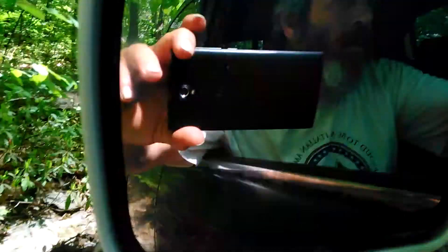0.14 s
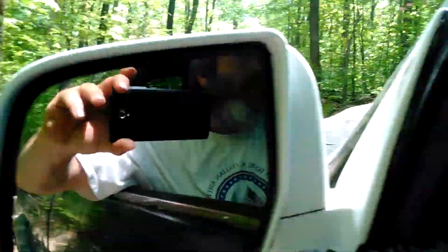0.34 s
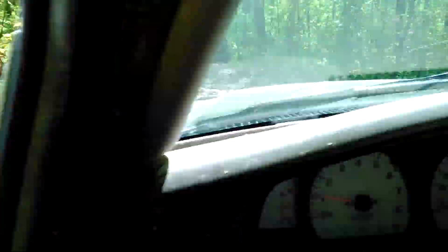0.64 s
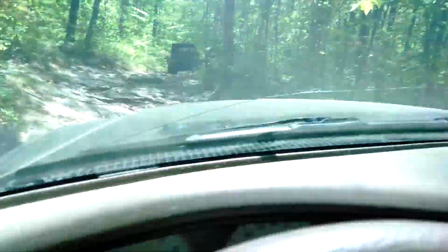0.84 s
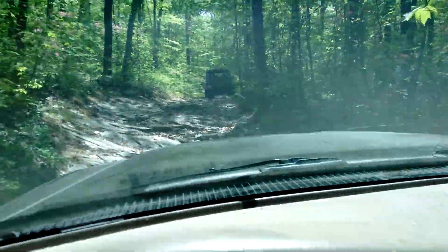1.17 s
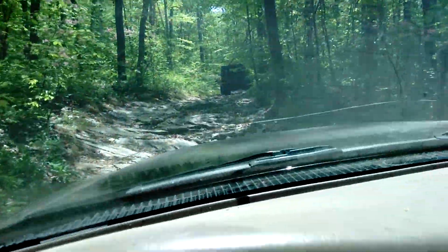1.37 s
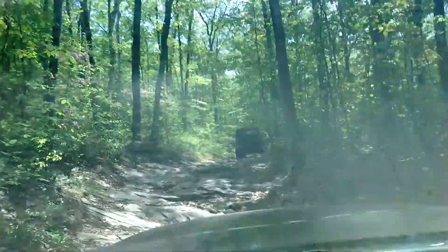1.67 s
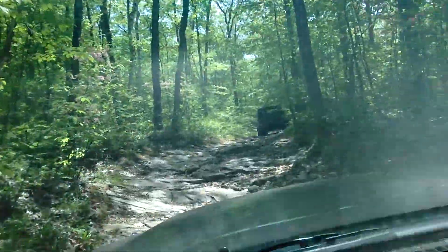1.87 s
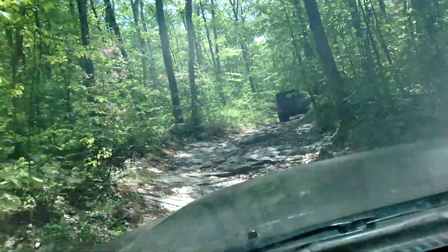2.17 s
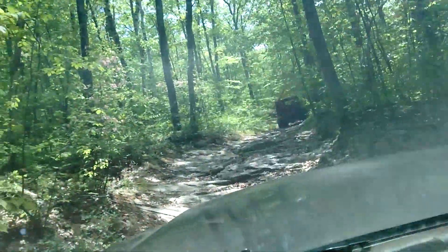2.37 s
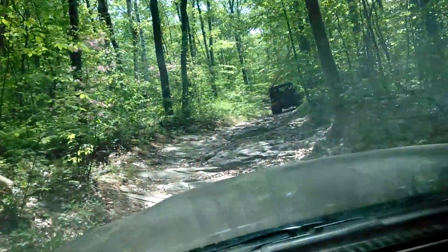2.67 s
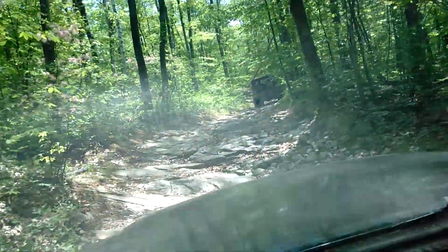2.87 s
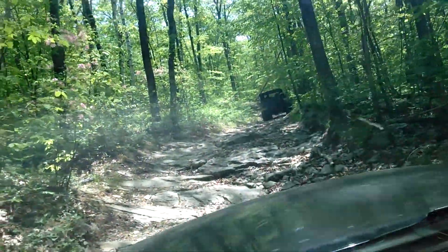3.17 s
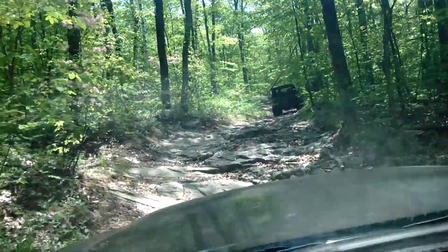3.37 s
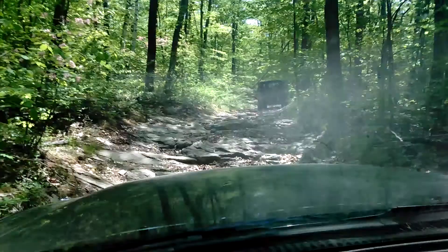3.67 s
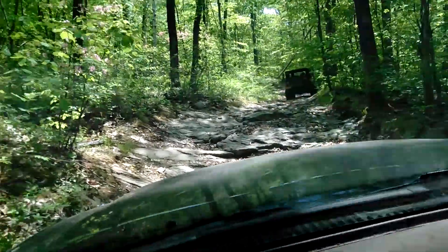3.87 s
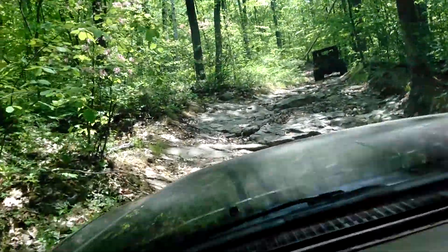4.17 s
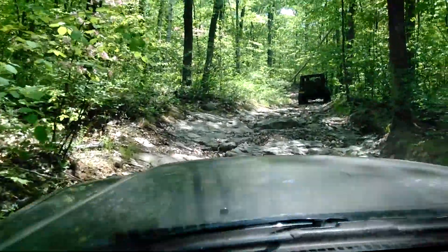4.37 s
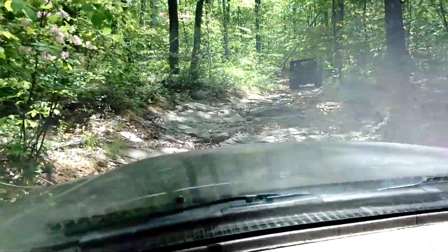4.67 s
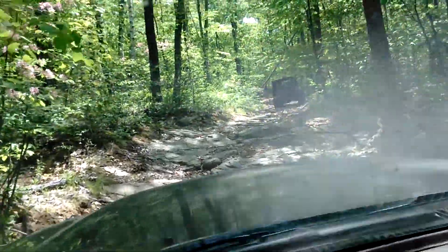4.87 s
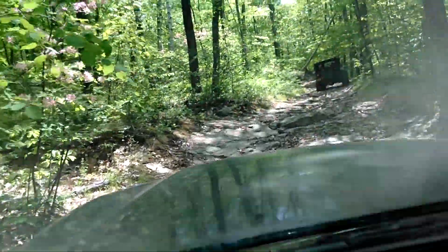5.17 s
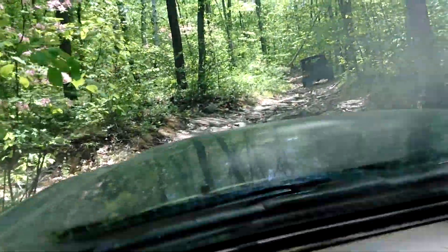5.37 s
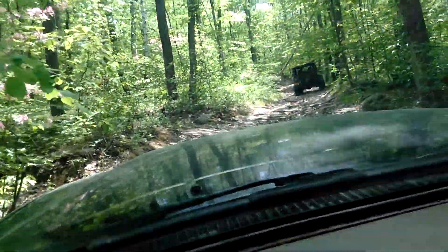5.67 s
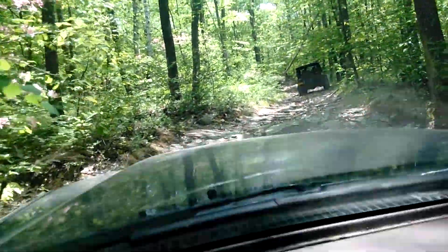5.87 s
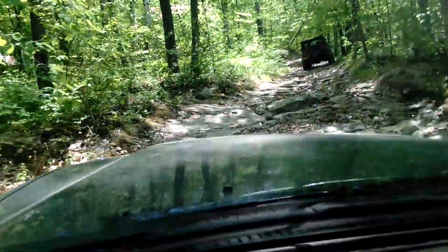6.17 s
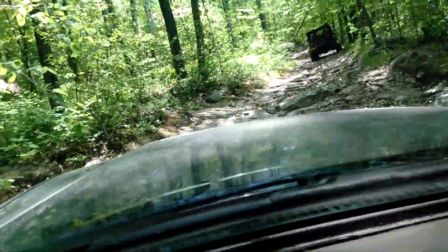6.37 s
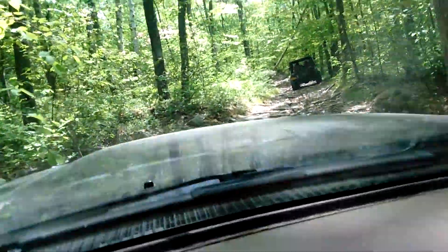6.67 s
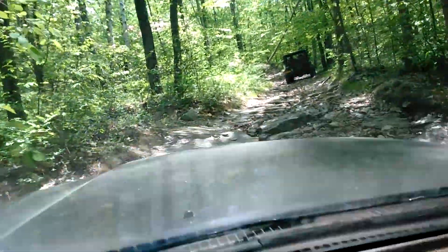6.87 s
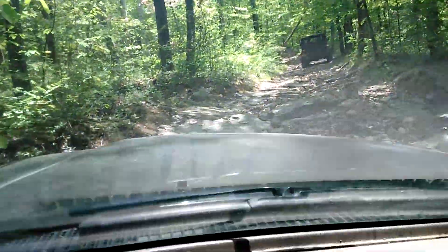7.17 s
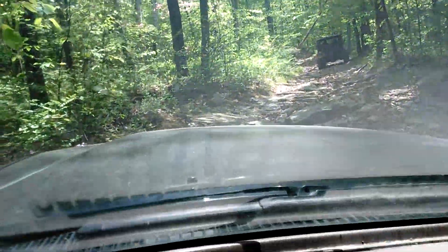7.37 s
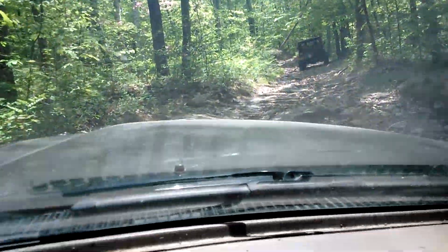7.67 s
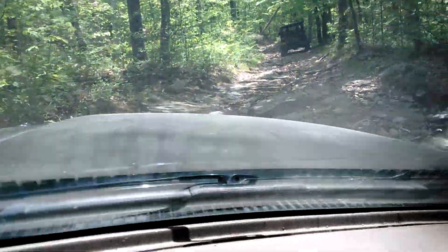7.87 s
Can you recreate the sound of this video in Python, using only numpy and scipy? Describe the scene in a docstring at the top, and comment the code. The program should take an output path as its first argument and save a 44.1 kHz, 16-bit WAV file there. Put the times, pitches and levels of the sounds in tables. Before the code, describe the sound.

A truck engine booms and roars in bursts of throttle, heard from the cab, with trim knocking and metal clinking over rocks.

```python
"""Off-road truck on a rocky climb

From the driver's seat, a truck climbs a forest trail in bursts of throttle. Exhaust pulses boom in the
cabin over the roar of engine and tyres, and a thin hiss comes and goes. At first the microphone is
outside the window, buffeted by wind as it is drawn in. Hand and trim scrape, two bright rustles pass
on the left, and at each rock the trim knocks into the panels and loose metal clinks."""
import sys
import numpy as np
from scipy import signal
from scipy.fft import rfft, irfft
from scipy.io import wavfile

SR = 44100
rng = np.random.default_rng(int(sys.argv[2]) if len(sys.argv) > 2 else 0)


def wrap_up_sound(samples):
    """Save the sound to the file named by the first command line argument, as 16-bit audio."""
    columns = np.atleast_2d(samples).T
    # keep every value between -1 and 1, then stretch to whole-number steps
    tamed = np.clip(columns, -1, 1)
    steps = np.round(tamed * 32767).astype(np.int16)
    wavfile.write(sys.argv[1], SR, steps)


N = 354123
TIME = np.arange(N) / SR
EQ_HZ = np.linspace(0, SR / 2, 2 ** 10 + 1)
INSIDE_S = .75  # the microphone is in the cab from here on
UPPER_FLUTTER = .33  # depth of the waver on the exhaust's upper partials

# Table levels are relative: each layer adds its own gain.
# pushes of the throttle (press [s], climb [s], hold [s], one bank's pulse rate at the press [Hz],
# at the top [Hz], load [dB], extra fade after the lift [dB/s])
THROTTLE_PUSHES = [(-0.31, 0.18, 0.16, 35, 37.33, -22, 45), (0.618, 0.4, 0.21, 35.56, 47.7, -19, 27),
                   (1.92, 0.25, 0.031, 24.02, 33.13, -18, -17), (2.204, 0.21, 0.046, 30.15, 36.6, -16.5, 1),
                   (3.033, 0.69, 0.48, 20.81, 47.31, -21, 16),
                   (4.191, 0.43, 0.024, 36.86, 51.25, -18.5, 46),
                   (5.111, 0.16, 0.012, 34.76, 35.1, -14.5, -2),
                   (5.274, .32, 0.13, 35.24, 47.4, -16.5, 109), (6.166, 0.43, 0.22, 27.53, 49.01, -17, 25),
                   (6.779, 0.082, 0.26, 45.64, 46.46, -18.5, 74),
                   (7.281, 0.31, 0.019, 24.47, 41.31, -17, 36)]
# the cabin's response to the exhaust (frequency [Hz], gain [dB])
CABIN_EQ = [(24, -38), (32, -21), (37, -9), (42, -2.5), (49, 5), (62, 9.5), (75, 5), (97, 1), (130, -6),
            (195, -18.5), (248, -9), (300, -13), (420, -27)]
# cylinder growl as the cabin passes it (frequency [Hz], level [dB])
GROWL_EQ = [(45, -35), (62, -28), (92, -25), (120, -27), (165, -26), (200, -32), (245, -26), (295, -26),
            (335, -31), (390, -35), (560, -44)]
# roar of engine and tyres (frequency [Hz], level [dB])
ROAR_EQ = [(30, -21), (50, 0), (95, 4.5), (135, -9.5), (166, 2.5), (215, -7), (290, -15), (400, -12),
           (600, -17.5), (1000, -23), (1300, -40.5), (6000, -49)]
# stereo width of the noise beds (frequency [Hz], left-right likeness [ratio, capped at 1])
STEREO_LIKENESS = [(110, 4.5), (140, 0.83), (300, 1), (600, .5), (1500, -0.22), (10000, 0.09)]
# stereo lean of the noise beds (frequency [Hz], left minus right [dB])
STEREO_LEAN = [(100, -1.5), (1400, 1), (2200, 2), (4400, 8.5), (6300, 0.5), (8200, -5.5), (10200, -11),
               (12000, 3.5), (14000, 5)]
# cabin air (frequency [Hz], level [dB])
AIR_EQ = [(500, 9.5), (1200, -2.5), (2100, 6), (3200, 2.5), (4400, -0.5), (6000, -8), (9000, 0.5),
          (12000, 5.5), (14500, -11.5)]
# thin top end of the hiss, snaps and cracks (frequency [Hz], level [dB])
HISS_EQ = [(2500, -11), (6000, -13.5), (8000, -10), (9300, -6.5), (10500, 0.5), (12000, -1.5),
           (13200, -6.5), (14500, -12.5)]
# swishes of hiss (start [s], length [s], level [dB])
HISS_SWISHES = [(-0.04, 0.25, -49.5), (0.664, 0.045, -46), (1.532, 0.098, -48.5), (2.083, 0.42, -50.5),
                (2.82, 0.73, -50), (4.442, 0.05, -48.5), (4.688, 0.31, -53), (5.376, 0.17, -46),
                (5.797, 0.52, -52.5), (6.548, 1, -54), (7.858, 0.1, -43.5)]
# tone of the open air (frequency [Hz], level [dB])
OPEN_AIR_EQ = [(200, -25), (450, 2), (900, -0.5), (1400, 1), (2300, -7.5), (3600, -23.5), (7000, -30)]
# swell and fade of the open air (time [s], level [dB])
OPEN_AIR_FADE = [(0, -50.5), (.08, -37), (.18, -40.5), (.3, -46.5), (.5, -48), (.72, -49), (.85, -57)]
# wind thumping the microphone (frequency [Hz], level [dB])
BUFFET_EQ = [(30, -19), (70, 11), (150, -0.5), (300, -7), (600, -9.5), (1200, -22.5), (2200, -47),
             (4500, -87)]
# eddies striking the microphone (time [s], level [dB], length [s], tilt [dB/octave])
EDDY_HITS = [(0.43, -30.5, 0.025, -1.5), (0.476, -23.5, 0.011, -0.5), (0.492, -24, 0.053, -3.5),
             (0.542, -23.5, 0.024, 1), (0.569, -14.5, 0.013, -2), (0.584, -18, 0.029, -4.5),
             (0.626, -17.5, 0.0068, 2.5), (0.633, -19.5, 0.019, -5), (0.681, -18, 0.012, 1),
             (0.696, -18, 0.0098, 5.5), (0.709, -22, 0.0086, 5)]
# dry scrapes and creaks of hand and trim (start [s], length [s], level [dB], centre [Hz])
SCRAPE_CUES = [(0.052, 0.039, -52, 3900), (0.146, 0.043, -51, 4370), (1.119, 0.024, -47.5, 1120),
               (2.027, 0.095, -56, 4460), (2.2, 0.1, -35, 538), (2.316, .025, -49.5, 1680),
               (2.888, .13, -58.5, 4450), (6.258, 0.024, -46, 2040)]
# knocks of trim, chassis and handling (time [s], body [dB], centre [Hz], spread [octaves], snap [dB])
KNOCK_HITS = [(0.109, -26.5, 605, 0.64, -64), (0.519, -43, 1830, 0.1, -51), (0.634, -42, 1980, 0.39, -70),
              (2.662, -46.5, 1640, 0.19, -46.5), (3.746, -42.5, 1505, 0.55, -40.5),
              (3.818, -51, 1810, 0.47, -53), (4.022, -39, 2350, 0.64, -35), (4.739, -35, 1134, 0.84, -31.5),
              (4.767, -40, 1850, 1.3, -37), (4.926, -41.5, 2400, 1.8, -49), (5.493, -35, 800, 0.54, -28.5),
              (5.517, -49, 840, 0.88, -38), (5.808, -36, 520, 0.36, -62), (5.877, -36.5, 990, 0.74, -34),
              (6.012, -44, 1550, 0.79, -35), (6.033, -33, 1250, 0.89, -29), (6.079, -49.5, 3600, 0.52, -44),
              (6.642, -44.5, 908, 0.82, -38), (6.811, -34.5, 1290, 0.84, -33),
              (6.861, -32, 1457, 0.78, -34.5), (7.014, -37.5, 1113, 0.61, -42),
              (7.074, -43, 1790, 1.2, -54), (7.856, -39.5, 1298, 0.58, -36),
              (7.898, -34.5, 1868, 0.46, -56)]
# panel resonances (frequency [Hz], width [Hz], boost [dB])
PANEL_PEAKS = [(727, 70, 9), (1160, 70, 6), (1670, 90, 4), (4125, 130, 9)]
# clinks of loose metal, and two short bright rustles on the left at 1.355 and 1.503 s (time [s],
# level [dB], ring pitch [Hz], left minus right [dB], ring over crack [dB], chatter t60 [s])
CLINK_AND_RUSTLE_CUES = [(0.75, -19.5, 9400, -4, -8, 0.027), (1.355, -31, 11750, 12, -8, 0.18),
                         (1.503, -29, 12600, 16, 3, 0.18), (1.5995, -11, 10520, 2.5, -9, 0.007),
                         (1.9056, -24.5, 11100, 14.5, -15, 0.0053), (2.164, -25, 10580, 4, -9, 0.013),
                         (4.0184, -11.5, 10940, -3, -3, 0.037), (4.028, -10.5, 11900, 1, 5, 0.029),
                         (4.78, -10, 11900, 1, 9, .04), (4.9245, -6.5, 10400, -2, -21, 0.024),
                         (5.8778, -15, 11900, -3, 3, 0.017), (6.0083, -17, 9860, 3.5, -6, 0.023),
                         (6.073, -23, 12900, 4, 1, 0.11), (6.159, -1.5, 11710, 5.5, 13, 0.04),
                         (6.18, -16, 12300, 6, -8, .04), (6.234, -17, 11360, 1, -2, 0.061),
                         (7.0151, -2.5, 12430, -7, -20, 0.0064), (7.022, -9, 10800, 2, -9, 0.04),
                         (7.074, -13, 11500, -5, -9, 0.014), (7.279, -17, 11900, -3, -27, 0.11),
                         (7.5705, -18, 10570, -7, -4, 0.029)]
# modes of the bright ring (multiple of ring pitch [ratio], level [dB], t60 [s])
RING_MODES = [(.53, -16, .04), (.82, -6, .045), (.917, -6, .035), (1, 0, .036), (1.035, -2, .036),
              (1.13, -2, .025)]


def amp(db):
    """Decibels to gain."""
    return 10 ** (np.asarray(db) / 20)


def unit_rms(x):
    """Scales to an rms of one."""
    return x / np.sqrt(np.mean(x ** 2) + 1e-20)


def curve_at(points, hz):
    """Reads a curve on a log-frequency axis."""
    f, value = np.transpose(points)
    return np.interp(np.log(hz + 1), np.log(f), value)


def since(s):
    """Seconds since a cue; zero before it."""
    return np.maximum(TIME - s, 0)


def glide(s, length, skew):
    """An S-curve from zero to one; a skew under one makes it move early."""
    return np.sin(np.pi / 2 * np.minimum(since(s) / max(length, 1 / SR), 1) ** skew) ** 2


def place(mix, s, sound, pan_db=0):
    """Drops a stereo sound into the mix; positive pan is left."""
    part = mix[:, max(round(s * SR), 0):][:, :sound.shape[1]]
    part += (sound * amp([[pan_db / 2], [-pan_db / 2]]))[:, :part.shape[1]]


def wander(rate_hz, size=4096):
    """Smooth random drift of unit size, no faster than the given rate."""
    hz = np.fft.rfftfreq(size, N / SR / size)
    slow = unit_rms(irfft(rfft(rng.standard_normal(size)) * (hz < rate_hz) * (hz > 0), size))
    return np.interp(TIME, np.linspace(0, N / SR, size), slow)


def noise_bed(spectrum):
    """Coloured stereo noise, narrow in the bass and wide in the treble."""
    hz = np.fft.rfftfreq(N, 1 / SR)
    common, separate = rfft(rng.standard_normal((2, N)))
    likeness = np.clip(curve_at(STEREO_LIKENESS, hz), -1, 1)
    lean = amp(curve_at(STEREO_LEAN, hz) / 2)
    right = likeness * common + np.sqrt(1 - likeness ** 2) * separate
    stereo = np.array([common * lean, right / lean])
    return unit_rms(irfft(stereo * amp(curve_at(spectrum, hz)), N))


def equalise(x, gain_db):
    """Causal filter with a gain for each frequency in EQ_HZ."""
    log_gain = np.log(amp(np.r_[gain_db, gain_db[-2:0:-1]]))
    taps = np.fft.ifft(np.exp(np.conj(signal.hilbert(log_gain)))).real
    return signal.fftconvolve(x, taps[None], axes=1)[:, :x.shape[1]]


def throttle(sag_hz_per_s=10.4, attack_s=.19, ease_db_per_s=32, coast_db=-45.5):
    """Pulse rate and load: revs climb on the press, sag against the slope, run down after the lift."""
    pulse_hz, load = np.zeros(N), np.full(N, amp(coast_db))
    troughs = [(row[0], row[3]) for row in THROTTLE_PUSHES[1:]] + [(8.15, 25)]  # ends at idle
    for row, (next_s, next_hz) in zip(THROTTLE_PUSHES, troughs):
        press, climb, hold, low_hz, top_hz, db, drop = row
        crest, lift = press + climb, press + climb + hold
        sag_hz = sag_hz_per_s * (since(crest) - since(lift))
        driven = low_hz + (top_hz - low_hz) * glide(press, climb, skew=1.06) - sag_hz
        revs = driven + (next_hz - driven) * glide(lift, next_s - lift, skew=.78)
        pulse_hz = np.where(TIME >= press, revs, pulse_hz)
        attack = np.minimum(since(press) / attack_s, 1)
        load = np.maximum(load, attack * amp(db - ease_db_per_s * since(crest) - drop * since(lift)))
    return pulse_hz, load


def boom(angle, pulse_hz, fall_db=6.5, bite_db=2):
    """Exhaust harmonics sweep through the cabin's resonance, biting harder as the revs climb."""
    out = np.zeros(N)
    pulling = np.tanh(np.gradient(pulse_hz) * SR / 20)
    for k in range(1, 10):
        gain = amp(curve_at(CABIN_EQ, k * pulse_hz) - (fall_db - bite_db * pulling) * np.log2(k))
        flutter = 1 + UPPER_FLUTTER * wander(13) if k > 2 else amp(1.3 * wander(28))
        out += gain * flutter * np.cos(k * angle + 2 * np.pi * rng.random())
    return out


def growl(angle, pulse_hz, revs_db_per_octave=3, width_radians_per_hz=.0037):
    """A bank's three cylinders fire unequally: partials at thirds of the pulse rate ride the revs."""
    out = np.zeros((2, N))
    for k in range(4, 39):
        hz = k * pulse_hz / 3
        phase = k * angle / 3 + 2 * np.pi * rng.random()
        apart = width_radians_per_hz * hz * rng.standard_normal() / 2
        flutter = 1 + UPPER_FLUTTER * wander(8)
        out += amp(curve_at(GROWL_EQ, hz)) * flutter * np.cos([phase + apart, phase - apart])
    return out * amp(revs_db_per_octave * np.log2(pulse_hz / pulse_hz.mean()))


def roar(load, lumps_db=2.5, dull_hz=300, coast_db=-33.5, load_db=-30.5):
    """Engine and tyres roar louder and brighter under load; muffled until the microphone settles."""
    full = noise_bed(ROAR_EQ)
    dull = signal.sosfilt(signal.butter(1, dull_hz, fs=SR, output="sos"), full)
    muffle_db = np.interp(TIME, [2.04, 2.05], [-7, 0])
    brightness = (.66 + 1.715 * load) * amp(muffle_db)
    level = amp(coast_db) + amp(load_db) * load
    return (dull + brightness * (full - dull)) * level * amp(lumps_db * wander(25))


def engine(wobble=.004, throb=.04, boom_db=3):
    """The exhaust booms and growls with the load; the roar throbs with the firings."""
    pulse_hz, load = throttle()
    angle = 2 * np.pi * np.cumsum(pulse_hz * (1 + wobble * wander(12))) / SR
    exhaust = load * (amp(boom_db) * boom(angle, pulse_hz) + growl(angle, pulse_hz))
    firings = 1 + throb * np.cos(2 * angle)  # two banks: two firings per turn of the angle
    return exhaust * amp([[.6], [-.6]]) + roar(load) * firings


def hiss(floor_db=-61, attack_s=.03, fade_db_per_s=75, flicker_db=2, gain_db=2):
    """Cabin air, and a thin hiss that comes in swishes: a quick rise, a hold and a fade."""
    power = amp(floor_db) ** 2
    for s, length, db in HISS_SWISHES:
        swish = np.minimum(since(s) / attack_s, 1) * amp(db - fade_db_per_s * since(s + length))
        power = power + swish ** 2
    air_db = np.interp(TIME, [1.3, 2.0], [-58, -55])  # swells as the microphone settles inside
    air = noise_bed(AIR_EQ) * amp(air_db + wander(7.4))
    return air + noise_bed(HISS_EQ) * np.sqrt(power) * amp(gain_db + flicker_db * wander(33))


def wind(gust_db=-3.5):
    """Eddies slap the microphone at the window; open air sinks to a faint bed as it comes inside."""
    out = noise_bed(OPEN_AIR_EQ) * amp(np.interp(TIME, *np.transpose(OPEN_AIR_FADE)))
    for s, db, length, tilt in EDDY_HITS:
        tone_db = curve_at(BUFFET_EQ, EQ_HZ) + tilt * np.log2(1 + EQ_HZ / 200)
        puff = equalise(rng.standard_normal((2, SR // 5)), tone_db)[:, -round(length * SR):]
        puff = unit_rms(puff / puff.std(axis=1, keepdims=True))
        place(out, s, amp(db + gust_db) * puff * signal.windows.tukey(puff.shape[1], .3), pan_db=24)
    return out


def scrapes(slope_db_per_octave=48, grain_db=4):
    """Surfaces slip in tiny uneven grains: a soft swell round one broad resonance."""
    out, size = np.zeros((2, N)), SR // 4
    for s, length, db, centre_hz in SCRAPE_CUES:
        grains = amp(grain_db * rng.standard_normal(size)[np.arange(size) // 100])
        slips = rng.standard_normal((2, size)) * grains
        tone_db = np.maximum(-slope_db_per_octave * abs(np.log2((EQ_HZ + 1) / centre_hz)), -70)
        rub = equalise(slips, tone_db)[:, -round(length * SR):]
        place(out, s, amp(db) * unit_rms(rub * signal.windows.hann(rub.shape[1])), pan_db=3)
    return out


def chatter(t, t60, tail_db, tail_t60, grain_db=5, rebounds_per_s=70, rebound_db=7):
    """A contact breaks into tiny impacts, then rebounds loosely; the cabin adds a diffuse tail."""
    force = np.clip(rng.standard_normal(len(t)), -2, 2)
    force[:2] = 1.2  # a firm first hit
    impacts = unit_rms(amp(grain_db * force)[np.arange(len(t)) // 20])
    stereo = rng.standard_normal((2, len(t))) + .25 * rng.standard_normal(len(t))
    attack = 1 - np.exp(-t / (t60 / 70))
    blow, tail = amp(-60 * t / t60), amp(tail_db - 60 * t / tail_t60)
    bounces = rng.random(len(t)) < rebounds_per_s / SR
    bounce_gain = amp(tail_db + rebound_db - 60 * t / (tail_t60 / 2))
    rebounds = signal.fftconvolve(bounces * bounce_gain, blow)[:len(t)]
    return stereo * attack * (impacts * (blow + rebounds) + tail)


def ripple(depth_db, bins):
    """Every struck part has its own narrow resonances: random peaks and dips in dB."""
    return depth_db * unit_rms(np.convolve(rng.standard_normal(len(EQ_HZ)), np.hanning(bins), "same"))


def knocks(t60=.044, cabin_db=-19, body_db=2, snap_db=-5):
    """Each jolt chatters into the panels, with a bright snap at the contact."""
    out, t, onset = np.zeros((2, N)), np.arange(SR // 3) / SR, slice(SR // 40)
    panels_db = sum(db / (1 + (2 * (EQ_HZ - hz) / width) ** 2) for hz, width, db in PANEL_PEAKS)
    for s, db, centre_hz, spread, treble_db in KNOCK_HITS:
        inside = s > INSIDE_S  # outside, taps on the microphone's case have a short, dry body
        contact = chatter(t, t60 if inside else t60 / 4.3, cabin_db if inside else -np.inf, tail_t60=.52)
        octaves = np.log2((EQ_HZ + 30) / centre_hz) / max(spread, .15)
        tone_db = np.maximum(inside * panels_db - 3 * abs(octaves) ** 1.74, -70)
        body = equalise(contact, tone_db + ripple(2.53, bins=7))
        snap = chatter(t, t60, tail_db=-17, tail_t60=.35)
        snap = equalise(snap, curve_at(HISS_EQ, EQ_HZ) + ripple(4, bins=25))
        body *= amp(db + body_db) / body[:, onset].std()
        snap *= amp(treble_db + snap_db) / snap[:, onset].std()
        place(out, s, body + snap, pan_db=3)
    return out


def clinks_and_rustles(gain_db=-16.5, thin_hz=7500):
    """Loose metal clinks with a crack and a brief ring; two softer, longer cues rustle on the left."""
    out, t = np.zeros((2, N)), np.arange(SR // 4) / SR
    thin_db = 10 * np.clip(np.log2((EQ_HZ + 1) / thin_hz), -2, 0)  # little low end
    for s, db, ring_hz, pan_db, ring_db, t60 in CLINK_AND_RUSTLE_CUES:
        contact = chatter(t, t60, tail_db=-24, tail_t60=.15)
        crack = equalise(contact, curve_at(HISS_EQ, EQ_HZ) + thin_db + ripple(.5, bins=17))
        modes = sum(amp(mode_db - 60 * t / mode_t60) * np.sin(2 * np.pi * ratio * ring_hz * t)
                    for ratio, mode_db, mode_t60 in RING_MODES)
        ring = signal.fftconvolve(contact, modes[None], axes=1)[:, :len(t)]
        sound = unit_rms(crack) + amp(ring_db) * unit_rms(ring)
        place(out, s, sound * amp(db + gain_db) / sound[:, :SR // 100].std(), pan_db)
    return out


def scene():
    """The full mix at the driver's seat."""
    return engine() + hiss() + wind() + scrapes() + knocks() + clinks_and_rustles()


def record(dry, low_cut_hz=32, high_cut_hz=14350):
    """The microphone sheds the deepest bass; a steep cut takes off the very top."""
    thinned = signal.sosfilt(signal.butter(5, low_cut_hz, "highpass", fs=SR, output="sos"), dry)
    high_cut = signal.firwin(255, high_cut_hz, window=("kaiser", 8), fs=SR)
    return signal.oaconvolve(thinned, high_cut[None], "same")


dry = scene()
out = record(dry)
wrap_up_sound(out)
```